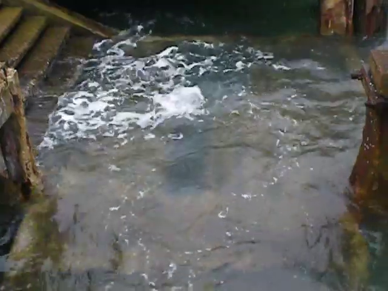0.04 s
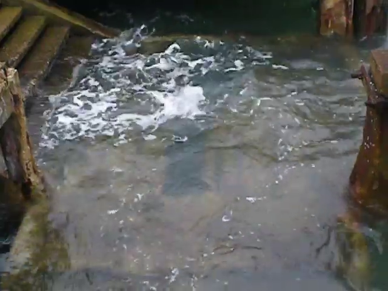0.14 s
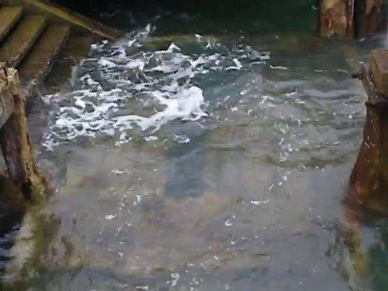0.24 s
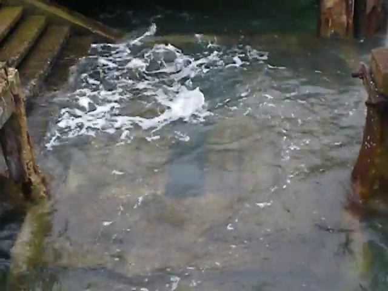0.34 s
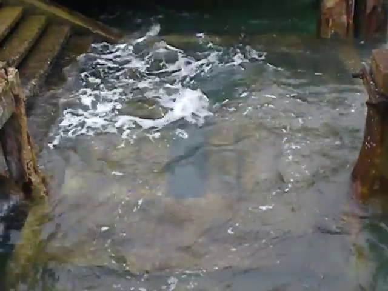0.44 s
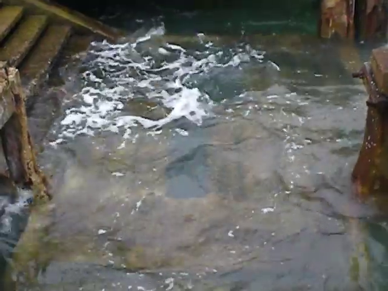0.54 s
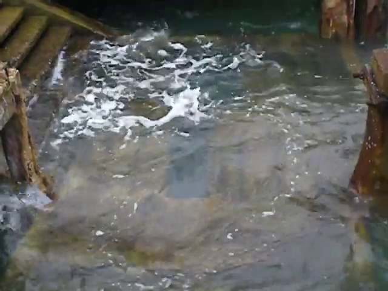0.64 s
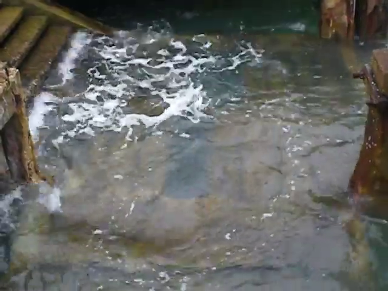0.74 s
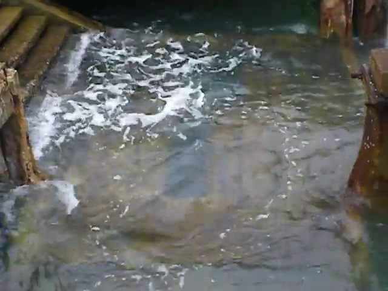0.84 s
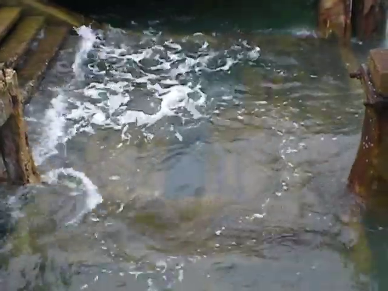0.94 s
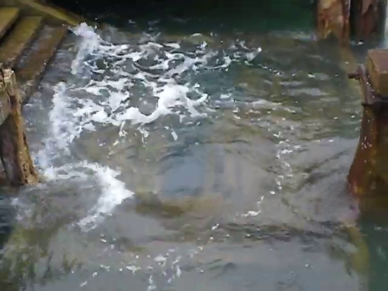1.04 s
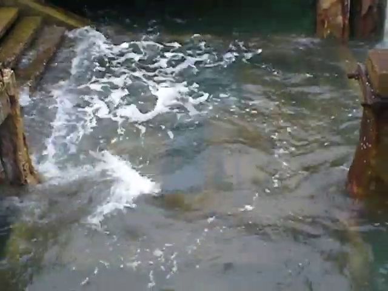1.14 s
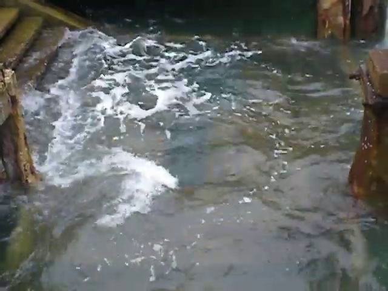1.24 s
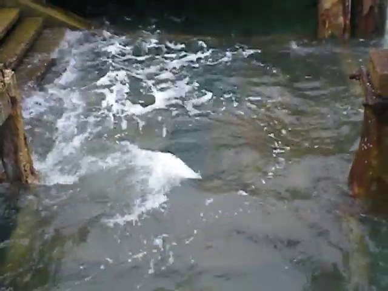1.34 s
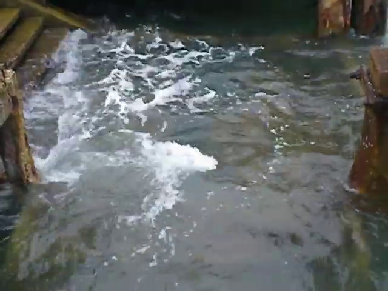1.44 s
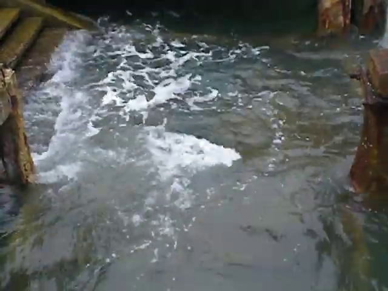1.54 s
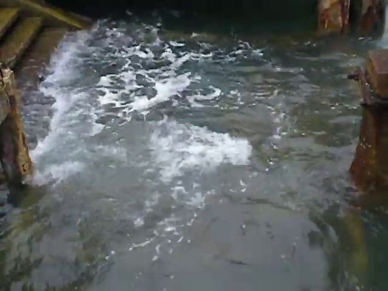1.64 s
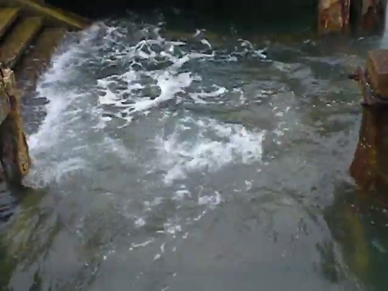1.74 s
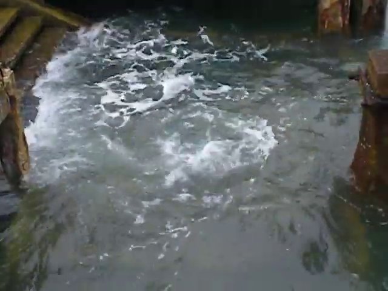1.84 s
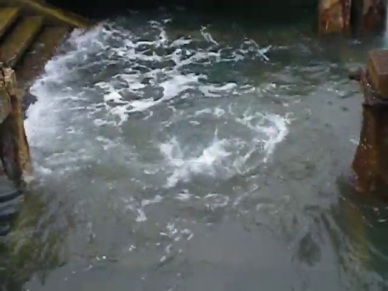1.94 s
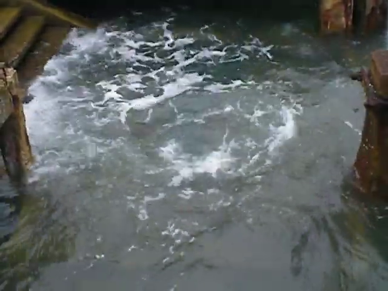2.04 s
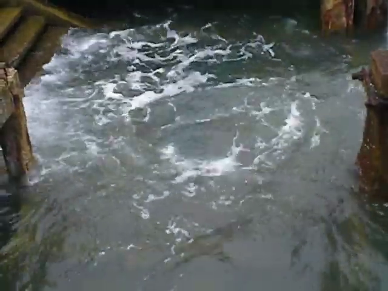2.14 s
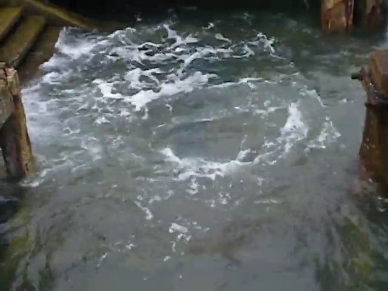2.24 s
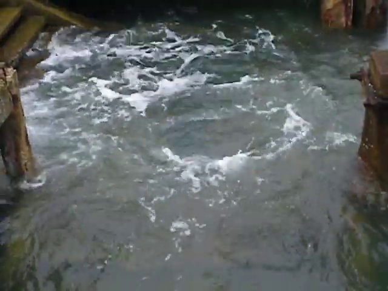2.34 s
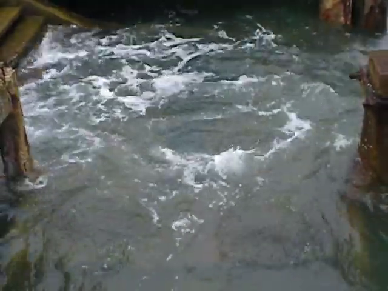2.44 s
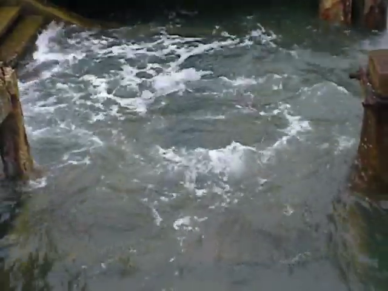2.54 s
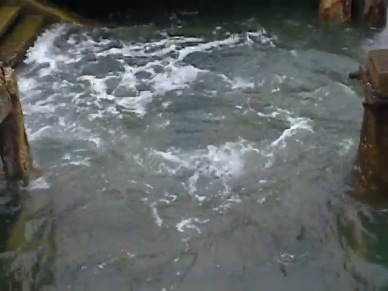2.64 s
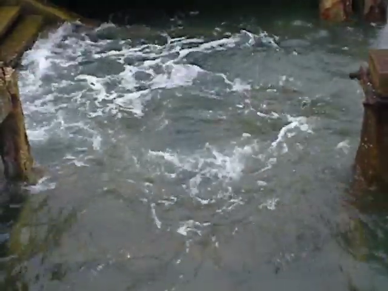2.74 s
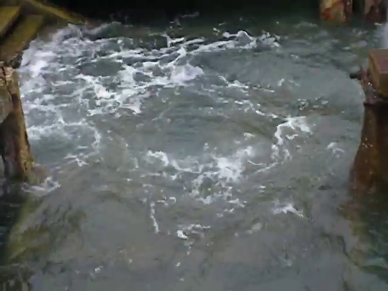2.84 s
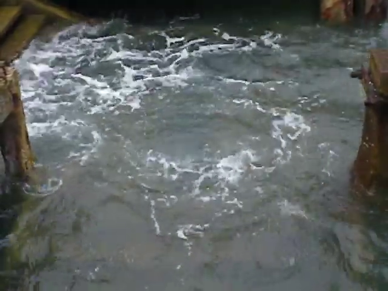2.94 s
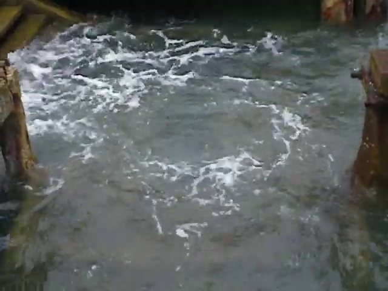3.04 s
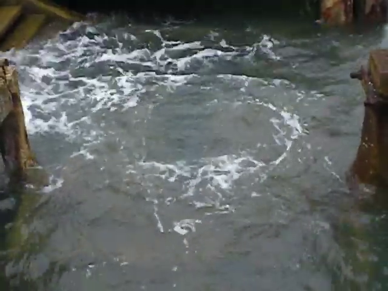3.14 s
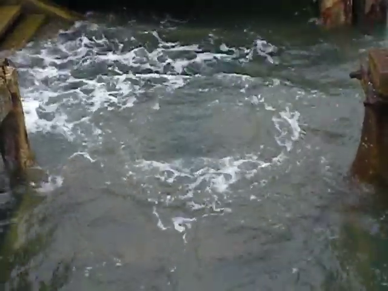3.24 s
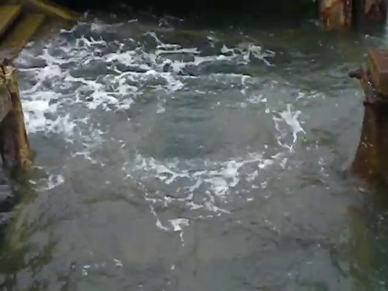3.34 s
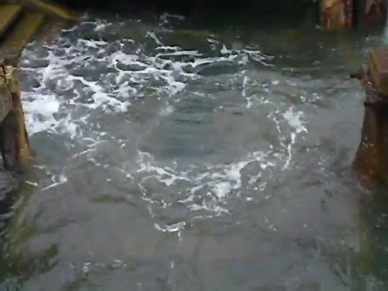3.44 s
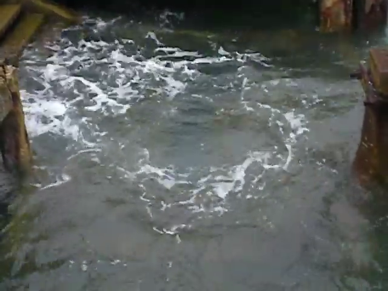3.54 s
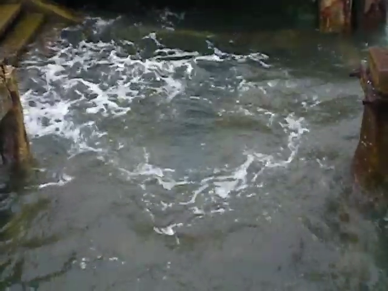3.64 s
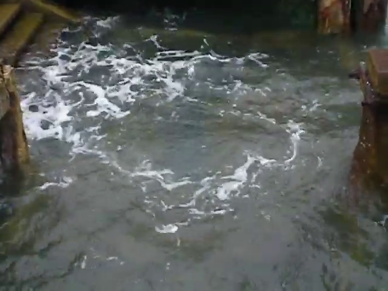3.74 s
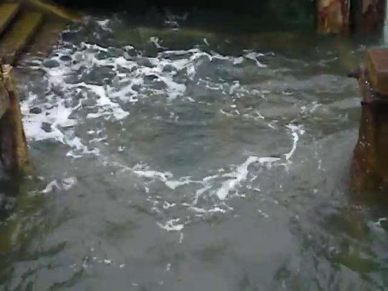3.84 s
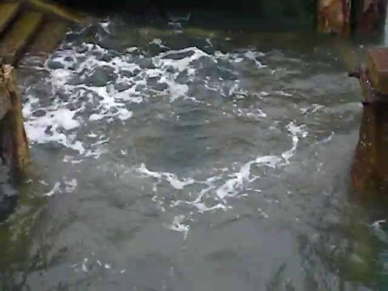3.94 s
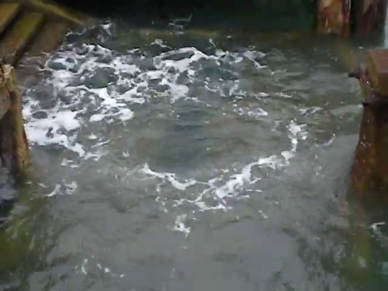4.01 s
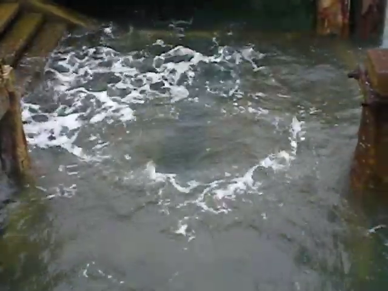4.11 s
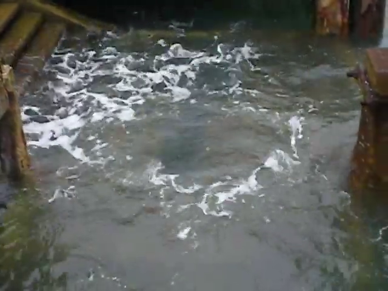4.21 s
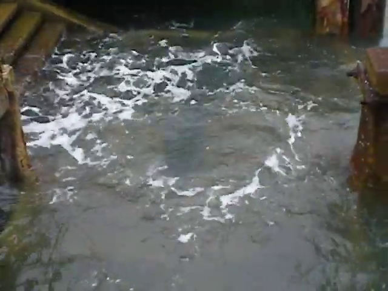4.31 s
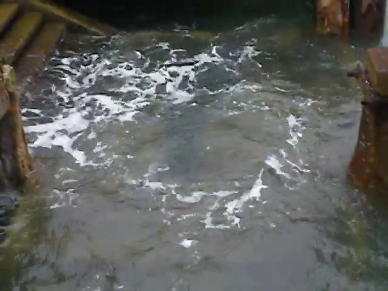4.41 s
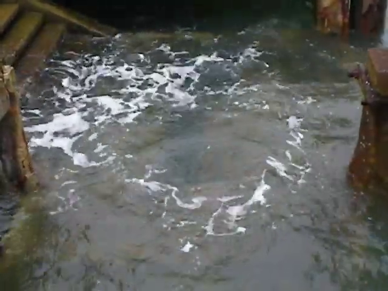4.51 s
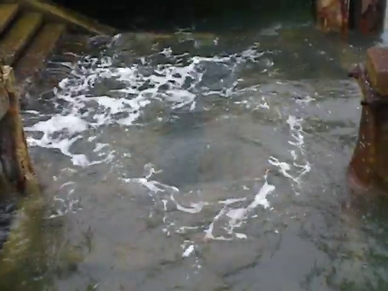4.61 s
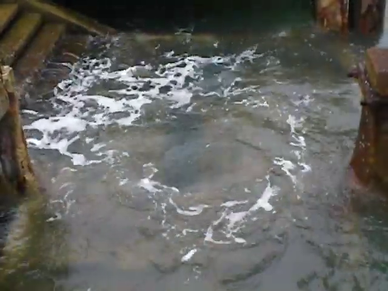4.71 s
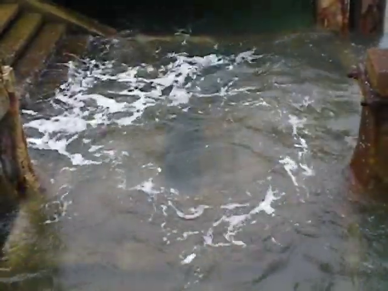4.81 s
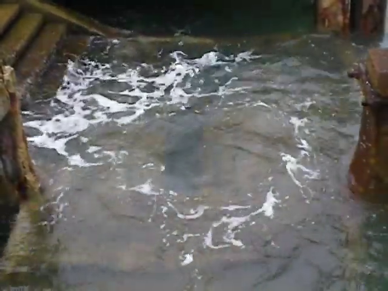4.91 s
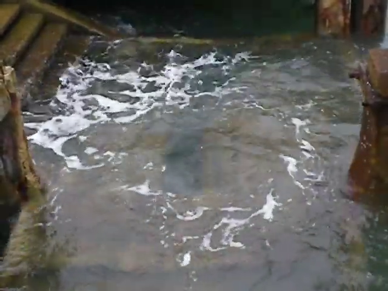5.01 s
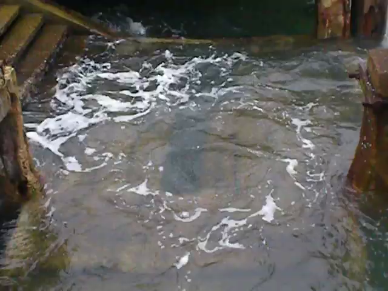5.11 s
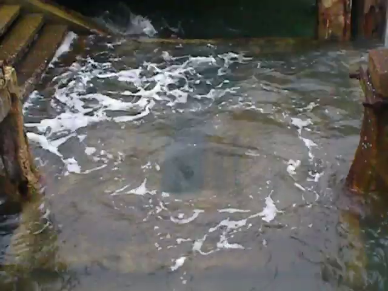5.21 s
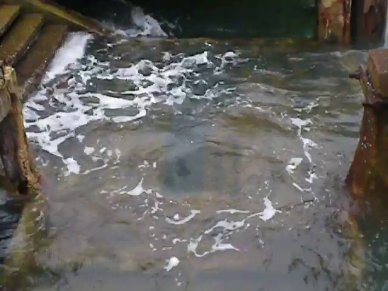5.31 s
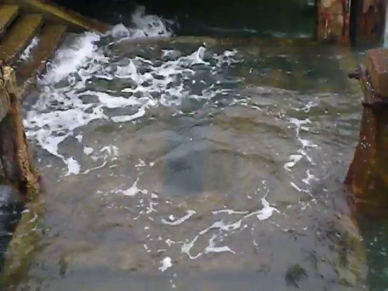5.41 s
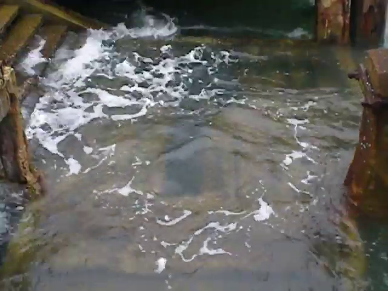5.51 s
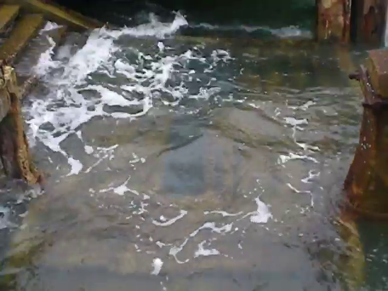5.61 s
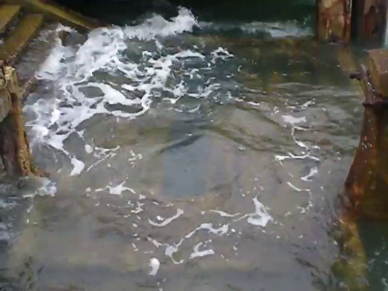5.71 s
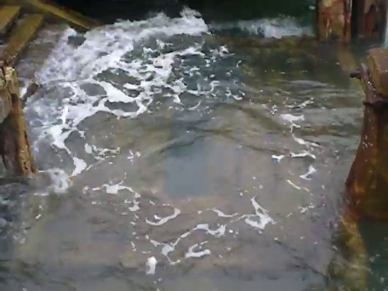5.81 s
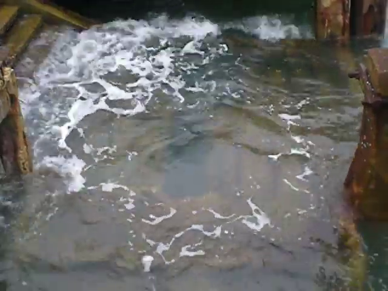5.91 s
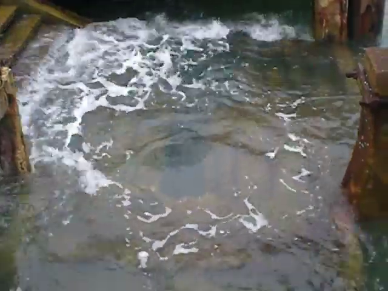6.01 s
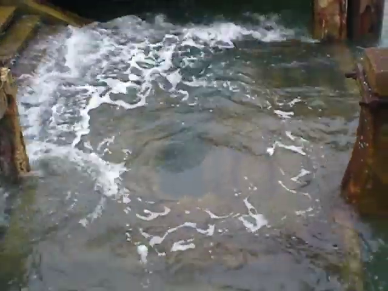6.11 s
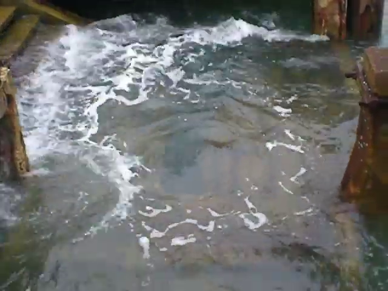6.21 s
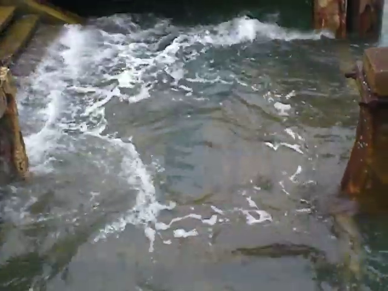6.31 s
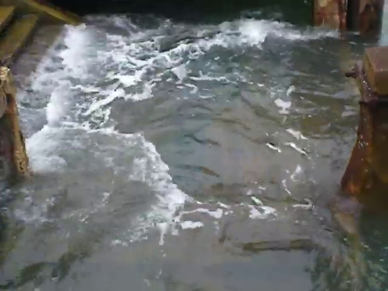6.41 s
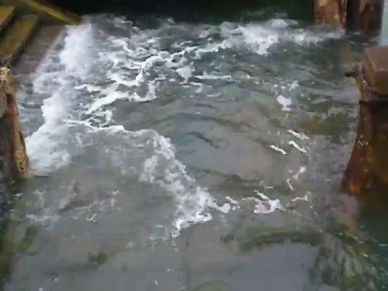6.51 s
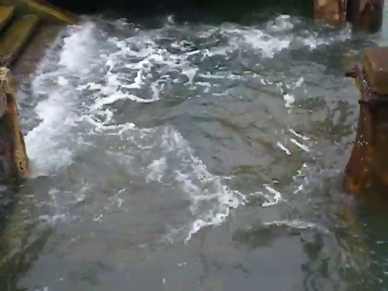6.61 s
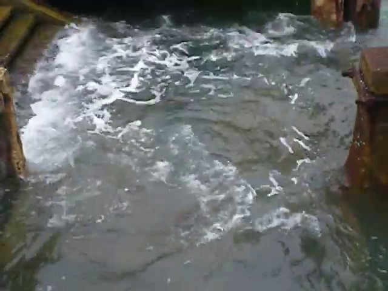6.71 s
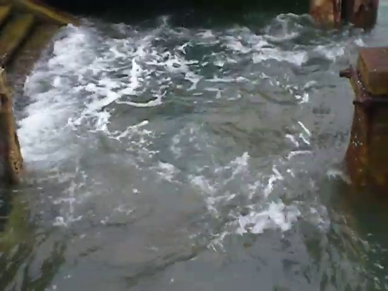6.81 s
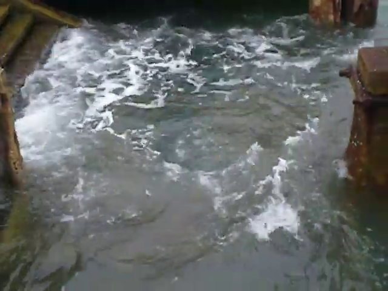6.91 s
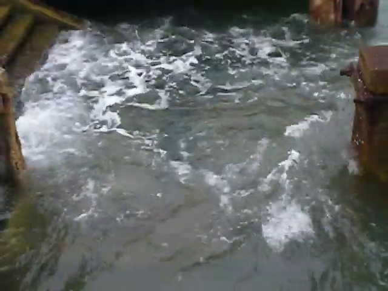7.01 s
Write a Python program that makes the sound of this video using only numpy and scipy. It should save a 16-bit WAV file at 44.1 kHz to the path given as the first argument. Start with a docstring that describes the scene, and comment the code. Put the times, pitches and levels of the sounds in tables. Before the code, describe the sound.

Sea water rushes and churns among the pilings of an old dock for about seven seconds, a continuous wash with foam fizzing on top. The first surge builds from about 0.7 seconds, breaking on a stone ramp with a few sharp little slaps and bubbly gulps around 1 second. Low thumps follow as the water folds over, and the churning is deepest from 2.3 to 2.8 seconds, with more slaps and gurgles. The rush eases slightly between 3 and 3.8 seconds, then rises near 4 to 4.5. A second surge breaks around 5.3 seconds and stays full, heaving low near 6.4, with a couple of small high plinks just before the end. Slaps and bubbles echo briefly under the deck, and the open sea rumbles very faintly beneath. The microphone stands a few metres above the water; the sound is mono with little treble.

```python
"""Under an old dock, sea swell surges between the pilings, breaks on a stone ramp and drains back, twice.
Clouds of bubbles rush, foam fizzes on top, and big air pockets churn below as the water folds over.
Crests slap the piles and near bubbles ring, both echoing under the deck; the open sea rumbles faintly.
A narrow-band mono microphone with a quick limiter stands a few metres above the water."""
import sys
import numpy as np
from scipy import signal
from scipy.fft import rfft, irfft
from scipy.io import wavfile
from scipy.ndimage import uniform_filter1d, map_coordinates

SR = 44100
rng = np.random.default_rng(int(sys.argv[2]) if len(sys.argv) > 2 else 0)


def wav_out(sig):
    """Save sig, one row per channel (or a flat mono array), as 16-bit PCM at SR to the path in sys.argv[1]."""
    wavfile.write(sys.argv[1], SR, np.round(np.clip(np.atleast_2d(sig).T, -1, 1) * 32767).astype(np.int16))


N = 311346

# The swell running up the ramp and draining back.
# Each row: time in seconds, relative levels of rush and of foam in dB.
SURGE = [(0.0, -20.5, -27), (0.45, -22, -27), (0.7, -20.5, -25), (1.3, -17.5, -23), (1.9, -19, -24.5),
         (2.2, -22.5, -27), (2.619, -17.5, -25), (3.25, -23, -28.5), (3.7, -23, -29.5), (4.12, -21.5, -29),
         (4.299, -17.5, -25.5), (4.55, -19, -23), (4.95, -21.5, -25.5), (5.22, -19.0, -26.5),
         (5.45, -18, -22.5), (6.2, -17.0, -22.5), (6.75, -19.0, -24.5), (7.06, -18.5, -22.5)]
# Crests toppling into white water.
# Each row: start in seconds, rise in seconds, relative levels of rush and of spray in dB.
BREAKS = [(0.65, .12, -19.5, -23.5), (0.92, .1, -19, -29), (2.44, .065, -32, -24.5),
          (2.63, .14, -23, -29.5), (2.9, .12, -31, -27.5), (3.81, 0.12, -22, -33.5),
          (5.03, 0.085, -21, -46), (5.26, 0.053, -18, -30), (5.34, 0.041, -20.5, -30),
          (5.45, .09, -28.5, -24), (5.77, .09, -26.5, -24), (6.43, .15, -19.5, -32),
          (6.77, 0.074, -21.5, -30)]
# Water heaving between the piles. Each row: time in seconds, relative level of the churn in dB.
HEAVE = [(0.0, -42.0), (0.6, -44), (1.05, -45), (1.8, -40), (2.251, -36), (2.701, -33.5), (3.2, -42),
         (3.7, -48.5), (4.3, -46.5), (4.95, -45), (5.8, -39.5), (6.4, -35), (6.7, -44.5), (7.06, -44.0)]


def rush():
    """Clouds of mid-sized bubbles roar with the surge and each crest, deeper when the water heaves."""
    # Tone of the rush. Each row: frequency in Hz, relative level in dB.
    tone = [(50, -42), (120, -26), (230, -6.5), (330, -6), (410, -3), (510, -4), (630, 0.24), (740, -0.5),
            (950, 0.1), (1230, -3), (1450, -9), (2000, -8.5), (3000, -32.5), (4400, -72.5)]
    far = seethe(patch_db=1.0, patch_hz=255, patch_s=0.032, flicker_db=0.54)
    near = bubbles(297.6, 1595, per_s=1300, spread_db=2.0, cycles=5.2, rise=0.033)
    cloud = white_water(far, near, near_db=-8.0, spectrum=tone)
    heave_db = along(*np.transpose(HEAVE))
    cloud = deepened(cloud, split_hz=1200, lift_db=0.11 * (heave_db + 40.5))  # neutral at -40.5 dB
    times, surge_db, _ = np.transpose(SURGE)
    crests = sum(gain_of(db) ** 2 * topple(start, rise_s) for start, rise_s, db, _ in BREAKS)
    level = np.sqrt(gain_of(along(times, surge_db)) ** 2 + crests)
    return gain_of(-1.51) * level * cloud


def foam():
    """Tiny bubbles burst, and spray falls back from each breaking crest."""
    # Tone of the fizz. Each row: frequency in Hz, relative level in dB.
    tone = [(400, -33), (1000, 1.5), (1500, -4.5), (1900, -3), (2350, -0.5), (2750, -4.5), (3100, -9),
            (3550, -15.5), (3800, -17.5), (4000, -28), (4250, -31.5), (4500, -38)]
    far = seethe(patch_db=0.0, patch_hz=387, patch_s=0.022, flicker_db=0.74)
    near = bubbles(1200, 4300, per_s=700, spread_db=1.5, cycles=7.6, rise=0.022)
    times, _, fizz_db = np.transpose(SURGE)
    spray = sum(gain_of(db) ** 2 * topple(start, rise_s) for start, rise_s, _, db in BREAKS)
    level = np.sqrt(gain_of(along(times, fizz_db)) ** 2 + spray)
    return gain_of(1.34) * level * white_water(far, near, near_db=-12.5, spectrum=tone)


def churn():
    """The largest air pockets wobble as the water heaves, and thump each time it folds over."""
    # Tone of the churn. Each row: frequency in Hz, relative level in dB.
    tone = [(20, -43), (45, -23), (70, -9), (105, -6), (160, -2.5), (250, 0.1), (380, 0.5), (520, -4),
            (900, -30), (2000, -66)]
    # Water folding over air. Each row: start in seconds, relative thump level in dB, bass lift in dB.
    folds = [(0.98, -40, -11), (1.25, -29.5, -5), (1.44, -32, 4.5), (1.63, -33.5, 4), (1.75, -25, -2.5),
             (1.97, -34.5, 0), (2.33, -27.5, 4.5), (2.51, -36, -2), (2.68, -39, 2), (3.86, -33.5, -10),
             (4.97, -39, 10), (5.26, -36.5, 5), (5.62, -37.5, 6), (5.8, -38, 2), (6.17, -34.5, -2),
             (6.42, -39, -10)]
    far = seethe(patch_db=0.0, patch_hz=150, patch_s=0.085, flicker_db=5.4)
    near = bubbles(105, 514, per_s=300, spread_db=3.5, cycles=2.5, rise=0.066)
    cloud = white_water(far, near, near_db=-7.5, spectrum=tone)
    thumps = [gain_of(db) ** 2 * topple(start, rise_s=0.1) for start, db, _ in folds]
    power = gain_of(along(*np.transpose(HEAVE))) ** 2 + sum(thumps)
    # Each fold tilts the bass by its share of the power.
    lift_db = sum(thump * bass_db for thump, (_, _, bass_db) in zip(thumps, folds)) / power
    return gain_of(3.5) * np.sqrt(power) * deepened(cloud, split_hz=200, lift_db=lift_db)


def slaps(cycles=1.5, spray_db=-10):
    """A crest smacks shut on a little air, with a short spit of spray."""
    # Crests hitting piles and ramp.
    # Each row: start in seconds, relative level in dB, pitch in Hz, spray decay time in seconds.
    hits = [(.7786, -6, 1243, 0.0015), (0.7798, 2, 2270, .001), (1.020, -3.5, 1900, .004),
            (1.113, -7, 1370, .006), (1.1727, 6.5, 1980, .001), (2.509, -5, 1086, 0.004),
            (2.514, -3, 2260, 0.006), (2.562, -9, 2300, .006), (2.708, -3.5, 2100, .005),
            (3.041, -9, 2000, .004), (3.254, -7.5, 2330, .004), (4.532, -5, 1930, .005),
            (5.881, -6.5, 2310, .006), (6.458, -5, 2030, .005)]
    out, t = np.zeros(N), np.arange(SR // 8) / SR
    for start, db, hz, decay_s in hits:
        band = signal.butter(3, [hz * .65, hz], "band", fs=SR, output="sos")
        hiss = evened(signal.sosfilt(band, rng.standard_normal(len(t))))
        add(out, start, gain_of(db) * bubble(hz, cycles, rise=0.018))
        add(out, start, gain_of(db + spray_db) * hiss * np.exp(-t / decay_s))
    return signal.sosfilt(signal.butter(3, [220, 3400], "band", fs=SR, output="sos"), out)


def gulps(cycles=6, rise=0.034):
    """Pockets of air close near the surface and ring, from deep gulps to small plinks."""
    # Bubbles that stand out. Each row: start in seconds, relative level in dB, pitch in Hz.
    pockets = [(.877, -2, 850), (1.081, -3, 635), (1.532, -12, 412), (1.629, -7.5, 445), (1.775, -10, 427),
               (1.851, -13.5, 206.5), (2.351, -1.5, 914), (2.476, -18, 311), (2.505, -7.5, 447),
               (2.622, 0, 800), (2.75, -11, 378), (3.035, -6, 860), (3.918, -17.5, 396), (3.959, -15, 335),
               (5.366, -6.5, 586), (5.528, -5.5, 589), (5.879, -7.5, 422), (6.248, -16, 332),
               (6.336, -3.5, 926), (6.562, -5, 1030), (6.878, -8.5, 3480), (6.984, -3.5, 2500)]
    out = np.zeros(N)
    for start, db, hz in pockets:
        add(out, start, gain_of(db) * bubble(hz, cycles, rise))
    return out


def dock_echo(x, predelay_s=0.012):
    """Scattered echoes off piles, deck and ramp ring longest in the low mids."""
    # Reverb under the dock. Each row: frequency in Hz, time to fall 60 dB in seconds.
    decay_times = [(150, 0.48), (600, 1), (1500, 0.51), (4000, 0.4)]
    hz, t, noise = signal.stft(rng.standard_normal(SR // 2), SR, nperseg=256)
    decay = gain_of(-60 * t / at_hz(decay_times, hz)[:, None])
    tail = signal.istft(noise * decay * (t > predelay_s), SR, nperseg=256)[1]
    return signal.fftconvolve(x, tail / np.linalg.norm(tail))[:N]


def sea():
    """The open sea lays a faint, steady rumble under everything."""
    # Tone of the rumble. Each row: frequency in Hz, relative level in dB.
    tone = [(15, -8), (40, -3.5), (70, -0.5), (120, -1), (300, -20.5), (1000, -60)]
    return gain_of(-68) * evened(coloured(rng.standard_normal(N), tone))


def bubble(hz, cycles, rise):
    """A pocket of air rings down over some cycles, its pitch rising as it nears the surface."""
    age = np.arange(int(5 * cycles * SR / hz) + 2) * hz / (cycles * SR)  # in decay times
    ring = np.sin(2 * np.pi * cycles * (age + rise * age ** 2 / 2))
    return ring * np.exp(-age) * (1 - np.exp(-age * cycles * 2))


def bubbles(low_hz, high_hz, per_s, spread_db, cycles, rise, sizes=60):
    """Bubbles of many sizes are born at random moments; a few are louder than the rest."""
    out = np.zeros(N)
    for hz in np.geomspace(low_hz, high_hz, sizes) * rng.uniform(.97, 1.03, sizes):
        ring = bubble(hz, cycles * rng.uniform(.5, 1.5), rise * rng.uniform(0, 2))
        chance = rng.random(N) * SR * sizes / per_s
        for at in np.flatnonzero(chance < 1):
            strength = gain_of(spread_db * min(-np.log(chance[at]), 4))
            polarity = (-1) ** (at % 2)
            add(out, at / SR, polarity * strength * hz * ring)
    return evened(out)


def seethe(patch_db, patch_hz, patch_s, flicker_db):
    """Countless far bubbles merge to noise that comes in patches and flickers as water lands."""
    hz, t, noise = signal.stft(rng.standard_normal(N), SR, nperseg=512, noverlap=384)
    grid = np.meshgrid(hz / patch_hz, t / patch_s, indexing="ij")
    patches = evened(map_coordinates(rng.standard_normal(noise.shape), grid, order=1, mode="wrap"))
    flicker = evened(uniform_filter1d(rng.standard_normal(len(t)), size=5))
    mottled = noise * gain_of(patch_db * patches + flicker_db * flicker)
    return evened(signal.istft(mottled, SR, nperseg=512, noverlap=384)[1][:N])


def white_water(far, near, near_db, spectrum):
    """Far and near bubbles blend into one cloud with a common tone."""
    return evened(coloured(far + gain_of(near_db) * near, spectrum))


def topple(start, rise_s, sharpness=9):
    """Power of one toppling mass of water: it builds to one, then dies away more slowly."""
    age = np.maximum(np.arange(N) / SR - start, 0) / rise_s
    return (age * np.exp(1 - age)) ** sharpness


def deepened(x, split_hz, lift_db):
    """Bigger bubbles ring lower: lifts or cuts the low end while keeping about the same power."""
    low = irfft(rfft(x) / (1 + (np.fft.rfftfreq(N, 1 / SR) / split_hz) ** 6), N)
    low_share = np.mean(low * x) / np.mean(x * x)
    lift = gain_of(lift_db)
    return (x + (lift - 1) * low) / np.sqrt(1 + low_share * (lift ** 2 - 1))


def coloured(x, spectrum):
    """Equalises a sound with a tone table."""
    return irfft(rfft(x) * gain_of(at_hz(spectrum, np.fft.rfftfreq(N, 1 / SR))), N)


def at_hz(points, hz):
    """Reads a table on a log-frequency axis."""
    table_hz, values = np.transpose(points)
    return np.interp(np.log(hz + 1), np.log(table_hz + 1), values)


def along(times, values):
    """Joins the points of an envelope, one value a sample."""
    return np.interp(np.arange(N) / SR, times, values)


def gain_of(db):
    """Decibels to amplitude."""
    return 10 ** (np.asarray(db) / 20)


def evened(x):
    """Scales to an rms of one."""
    return x / np.sqrt(np.mean(x ** 2) + 1e-20)


def add(mix, start_s, sound):
    """Mixes a sound in at a time."""
    part = mix[max(round(start_s * SR), 0):][:len(sound)]
    part += sound[:len(part)]


def low_passed(x, hz):
    """A steep low-pass."""
    taps = signal.firwin(601, hz, window=("kaiser", 9), fs=SR)
    return signal.oaconvolve(x, taps[None], "same")


def scene():
    """White water over the sea's rumble, with slaps and gulps thrown back by the dock."""
    near = slaps() + gain_of(-6.0) * gulps()
    return (churn() + rush() + foam() + near + gain_of(-10.5) * dock_echo(near) + sea())[None]


def record(dry, band_hz=4400, limit_db=-3, attack_s=0.0016, recover_db_per_s=300, ceiling=0.72):
    """A narrow-band microphone; a limiter ducks after a sharp slap, whose first cycles overload it."""
    heard = low_passed(dry, band_hz)
    peak_db = 20 * np.log10(abs(heard[0]) + 1e-9)
    recovery_db = np.arange(N) * recover_db_per_s / SR
    held_db = np.maximum.accumulate(peak_db + recovery_db) - recovery_db
    over_db = np.maximum(held_db - limit_db, 0)
    lag = np.exp(-1 / (attack_s * SR))
    ducked = heard / gain_of(signal.lfilter([1 - lag], [1, -lag], over_db))
    return low_passed(np.clip(ducked, -ceiling, ceiling), hz=15800)


dry = scene()
out = record(dry)
wav_out(out)
```